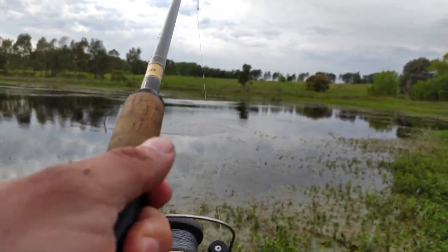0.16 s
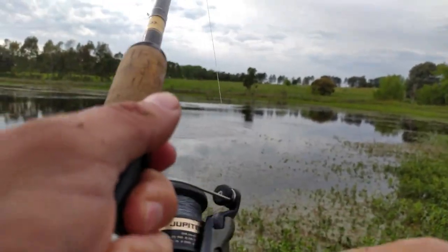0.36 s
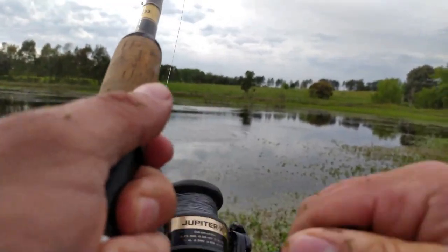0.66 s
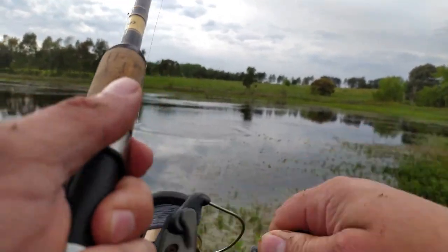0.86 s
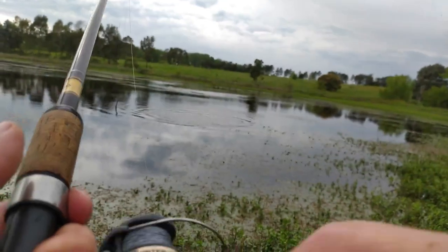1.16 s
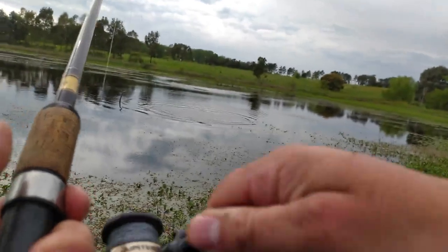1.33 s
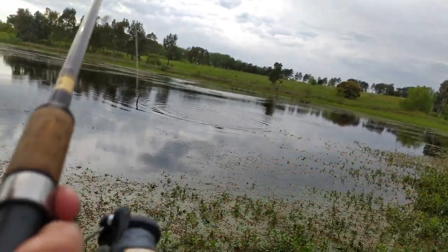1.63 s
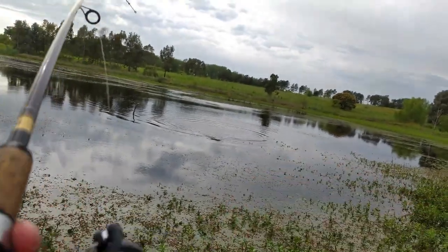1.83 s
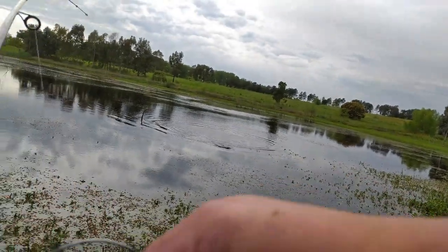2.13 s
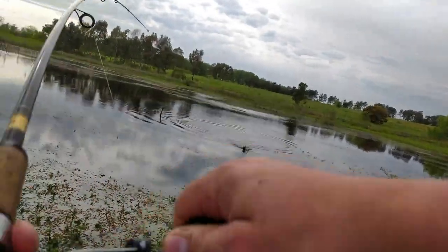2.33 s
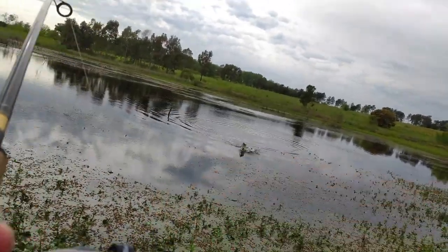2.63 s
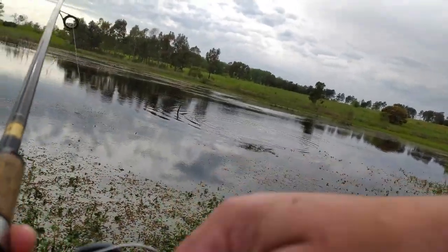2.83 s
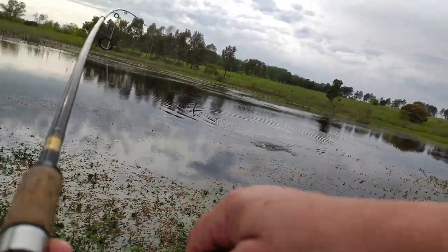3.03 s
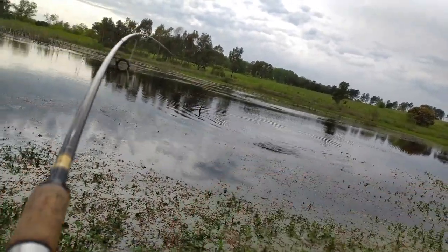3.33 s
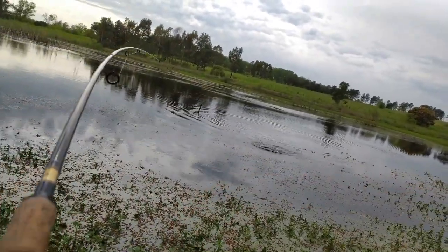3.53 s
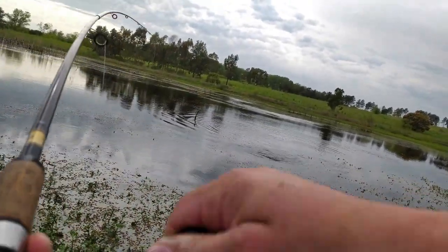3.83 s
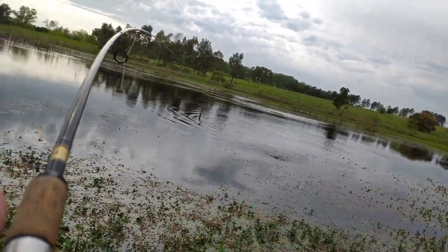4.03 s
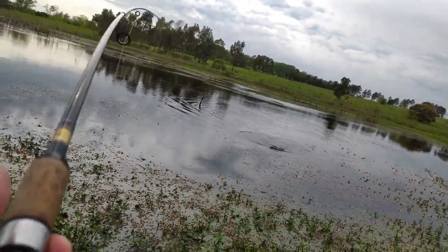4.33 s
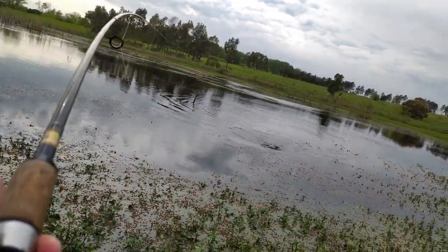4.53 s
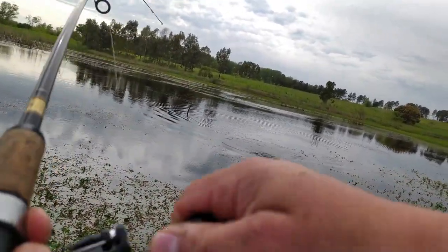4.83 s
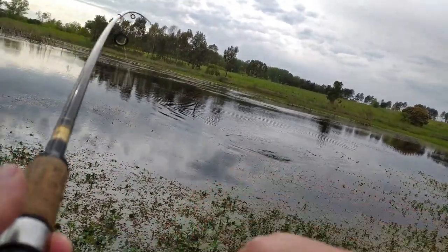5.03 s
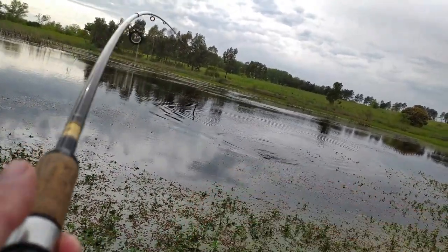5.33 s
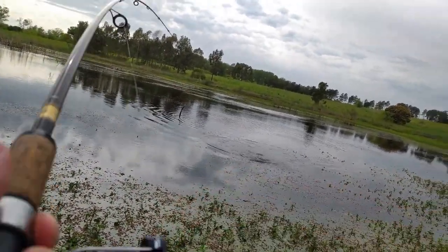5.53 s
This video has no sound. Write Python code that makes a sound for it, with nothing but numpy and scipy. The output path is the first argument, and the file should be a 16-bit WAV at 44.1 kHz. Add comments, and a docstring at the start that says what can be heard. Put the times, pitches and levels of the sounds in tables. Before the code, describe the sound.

A spinning reel is cranked close to the microphone outdoors, with bright metallic ratchet clicks, a fine scrape and a grainy gear whirr. At the very start a faint, thin whine sinks away, and wind buffets and crackles hard, mostly on the left. The clicking slows and stops at about 0.45 seconds, then resumes at 0.7 and continues to the end in uneven spurts, louder when faster. It is quickest around 1, 2.4, 2.7, 4 and 4.3 seconds and nearly stalls around 2.1, 3.3 and 4.15. The wind rumble eases after 1.5 seconds and returns in short gusts, with dull thumps on the left between 2.8 and 3.5 seconds and once more near 5.4. A faint bubble plops in the water at about 2.6 seconds, and several tiny ones follow from 4.5 to 4.8. A soft open-air hiss lies underneath until the end, near 5.7 seconds.

```python
"""Spinning reel by a windy pond

A reel is cranked in spurts: a sprung pawl scrapes up each ratchet tooth and clicks down, and the
gears whirr louder the faster the handle turns. Bubbles plop where a hooked fish stirs the water.
Gusts buffet and thump two microphone ports, mostly the left one. A faint whine sinks away at the
start, and a soft open-air hiss lies under it all."""
import sys
import numpy as np
from scipy import signal
from scipy.fft import rfft, irfft
from scipy.io import wavfile
from scipy.ndimage import uniform_filter1d

SR = 44100
rng = np.random.default_rng(int(sys.argv[2]) if len(sys.argv) > 2 else 0)


def pcm_store(signal):
    """Save signal as 16-bit PCM."""
    levels = np.round(np.clip(np.atleast_2d(signal), -1, 1) * 32767)
    wavfile.write(sys.argv[1], SR, levels.astype(np.int16).T)


N = 250929

PAN_SPLIT = np.array([[.5], [-.5]])   # a pan is left minus right in dB, half to each side
LEFT_ONLY = np.array([[1], [0]])
STEADY_TEETH_PER_S, LEFT_LAG_S = 50, 0.00024   # reference cranking speed; the right port is nearer


def reel():
    """Clicks, touches, scrape and whirr, all driven by the passing ratchet teeth."""
    s = tooth_times()
    level_db, pan_db, colour_db = drop_strengths(s)
    speed_db = 20 * np.log10(1 / (np.diff(s) * STEADY_TEETH_PER_S))
    force_db = uniform_filter1d(in_time((s[1:] + s[:-1]) / 2, speed_db), size=600)
    clicks = pawl_clicks(s, level_db, pan_db, colour_db)
    touches = pawl_touches(s, speed_db, pan_db, colour_db)
    left, right = clicks + touches + pawl_scrape(s, force_db) + gear_whirr(force_db)
    return np.array([np.pad(left, (round(LEFT_LAG_S * SR), 0))[:N], right])


# The handle is pushed and coasts. Each row: time in seconds, speed in ratchet teeth per second.
CRANK_SPEED = [(0.0, 49.43), (0.11, 46.03), (0.183, 20.55), (0.46, 0.0), (0.612, 0.25), (0.828, 45.01),
               (0.971, 95.55), (1.06, 62.59), (1.163, 84.02), (1.28, 44.13), (1.406, 45.55), (1.506, 81.95),
               (1.623, 37.74), (1.752, 63.68), (1.885, 36.57), (1.916, 41.72), (2.076, 8.19), (2.167, 7.44),
               (2.255, 53.05), (2.382, 76.46), (2.547, 53.61), (2.58, 20.13), (2.606, 52.79),
               (2.723, 86.67), (2.781, 34.81), (2.809, 60.91), (2.907, 18.49), (2.968, 16.58),
               (3.064, 61.61), (3.181, 79.01), (3.243, 32.27), (3.31, 11.27), (3.434, 77.99),
               (3.578, 42.04), (3.644, 41.04), (3.722, 12.53), (3.849, 50.25), (3.962, 60.18),
               (4.029, 80.75), (4.122, 6.61), (4.203, 8.77), (4.29, 93.52), (4.343, 58.85), (4.477, 9.58),
               (4.618, 42.05), (4.728, 24.55), (4.911, 52.4), (4.949, 29.0), (5.015, 22.52), (5.139, 82.41),
               (5.238, 24.0), (5.351, 50.35), (5.427, 36.15), (5.501, 47.48), (5.593, 21.76), (5.69, 22.24)]


def tooth_times():
    """The moments, in seconds, at which a tooth passes the pawl."""
    turned = np.cumsum(in_time(*np.transpose(CRANK_SPEED))) / SR
    tips = np.arange(int(turned[-1] - .5) + 1) + .5
    return np.searchsorted(turned, tips) / SR - .0005


# The load on the reel at steady speed. Each row: time in seconds, then faders in dB for
# gear mesh, pawl drag and pawl drop.
REEL_LOAD = [(0.0, -48, -42, -26), (0.1, -52.5, -48.5, -16), (0.41, -50.5, -39.5, -23),
             (0.7, -52.5, -45.5, -17), (0.95, -48, -40.5, -22), (1.22, -55.5, -43.5, -26.5),
             (1.55, -50.5, -41.5, -24), (1.7, -52, -40.5, -26), (1.8, -51.5, -43, -19),
             (2.0, -56.5, -40, -37), (2.38, -53, -41, -20), (2.55, -51.5, -40.5, -25),
             (2.82, -52.5, -43.5, -24), (3.2, -51.5, -42, -26.5), (3.47, -54, -44, -26),
             (3.66, -57, -45, -18), (4.0, -50, -40.5, -24), (4.17, -54, -40.5, -23), (4.3, -53, -44.5, -26),
             (4.45, -53.5, -42.5, -28), (4.8, -55.5, -42.5, -22.5), (4.97, -52, -43, -25.5),
             (5.13, -52.5, -43, -27), (5.25, -51, -41, -24), (5.48, -54, -44.5, -22),
             (5.69, -59.5, -42, -22.5)]
# The reel moves across the ports. Each row: time in seconds, pan in dB.
REEL_PAN = [(0, 6), (.8, 1), (1.5, -3), (2.0, 1.5), (2.5, -1.5), (2.9, -3), (3.1, -2.5), (3.6, 0.5),
            (4.4, -1.5), (5.69, -4)]
# The weight of the lower ring in clicks and scrape. Each row: time in seconds, boost in dB.
LOW_RING = [(0, 2), (.5, -2), (.9, -6.5), (1.3, -0.5), (1.8, -12), (2.4, -6.5), (2.9, -4), (3.15, -0.5),
            (3.4, 1), (3.65, 6), (3.9, -5), (4.3, 2.5), (4.8, -4.5), (5.3, 0), (5.69, 1)]
# Hand-placed clicks. Each row: time in seconds, then force, lower ring, top ring and pan, all in dB.
PLACED_DROPS = [(0.0093, -24.5, -6, -2, 0), (0.029, -28, 0, 0, 8), (0.051, -21, -3, -6, 2),
                (0.0722, -25, -1, 6, -1), (0.0928, -23, -7, -3, 8), (0.115, -21.5, -6, -9, -4),
                (0.1392, -21.5, -8, -13, 7.5), (0.174, -24, -0.5, 2, 4), (0.2233, -23, -1.5, 2, 5.5),
                (0.2923, -25.5, -5.5, 3, 6), (0.4272, -28.5, 1.5, 9, 1), (0.7058, -24.5, -5, 0, -4),
                (0.745, -22.5, -5.5, -4, 5), (0.777, -22, -7, 2, 5), (0.8047, -24, -2, 0, 5),
                (0.8299, -21, -9, -4, -2), (0.85, -19.5, -3, 3, -1), (0.8678, -25, 2, 7, 5),
                (0.883, -22, -5, 6, 4), (0.898, -19.5, -7, 2, 3), (0.911, -20, -8, 3, 0),
                (0.9242, -23, -4, 0, 5), (0.9366, -14, -6, -3, -7), (0.9482, -19, -7, 2, 3),
                (0.96, -19, -8, -1, 4), (0.971, -19, -14, -4, -5), (0.983, -21, -7, -2, 2),
                (0.9928, -18, -10, 0, -2), (1.0045, -18, -8, 1, 1), (1.0164, -21, -2, -3, 6),
                (1.029, -21, -6, 0, -4), (1.0429, -26, 3, 1, 3), (1.059, -23, -1, -3, 1),
                (1.075, -21, -2, -4, 5), (1.0902, -22, -7, 0, 6), (1.1047, -21, -5, -1, -1),
                (1.118, -19.5, 2, -2, 4), (1.1298, -22, -1, 1, -6), (1.1802, -26, -6, 0, -2),
                (1.1928, -24, -1, 2, -1), (1.2066, -23, -2, 0, 1), (1.2212, -20.5, -4, -2, 1),
                (1.239, -20.5, -2, -7, -3), (1.257, -20, -4, -7, 4), (1.2778, -26, 1, 3, -4),
                (1.3002, -21.5, -11, 2, 0), (1.3228, -26.5, 3, 4, -2), (1.3455, -25.5, 0, -2, 3),
                (1.3664, -26.5, 3, 0, 2), (1.3894, -23, -1, -1, 0), (1.4125, -23, -6, 0, 2),
                (1.4302, -21.5, 0, -2, 2), (1.4472, -19, -3, -2, -4), (1.4627, -21, -5, 0, 3),
                (1.4771, -20.5, 0, 3, 4), (1.4913, -20, 1, 0, 0), (1.5038, -21, -3, -1, 0),
                (1.5437, -24, -5, -5, 2), (1.56, -22, -2, -5, -2), (1.5776, -18.5, -3, -10, 2),
                (1.5968, -20, -11, -1, -6), (1.6187, -21.5, -9, -16, 11), (1.6443, -21.5, -11, -4, 0),
                (1.6676, -25, -2, -4, 8), (1.6885, -27, 2.5, -2, -2), (1.7064, -30, 5, 1, 1),
                (1.7239, -33, 12, -2, 0), (1.7408, -25, 4, 1, -2), (1.757, -23, -3, 0, 6),
                (1.7734, -22, -1, -1, 3), (1.7914, -19, 1, -1, -2), (1.8085, -21.5, 1, -3, 3),
                (1.829, -20.5, -1, 4, -1), (1.852, -25, 2, 2, 4), (1.876, -23.5, -1, 7, -4),
                (1.902, -26, -1, 2, -7), (1.9278, -29, 3, 2, -4), (1.954, -25.5, -3, 1, -8),
                (1.988, -23.5, -8, 6, -6), (2.0344, -28, 2, 13, 0), (2.1359, -22, -7, -10, -3),
                (2.2082, -23, -6, -1, -6), (2.2356, -22.5, -13, 8, -3), (2.2566, -23.5, -3, 2, 2),
                (2.2746, -23, -4, 4, -1), (2.2915, -29.5, 10.5, 2, -4), (2.3074, -22, -3, 1, -4),
                (2.3237, -20.5, -4, 2, -3), (2.339, -22, -4, 8, 1), (2.353, -23, -12, 0, 2),
                (2.3666, -16.5, -10, -5, 5), (2.3806, -17.5, -7, 1, -7), (2.3934, -17, -5, -2, 7),
                (2.4067, -21, -14, -1, 6), (2.42, -20, -8, -4, 2), (2.4326, -19, -7, 1, 1),
                (2.4472, -22, -2, 2, 2), (2.4635, -20, -1, 0, -4), (2.481, -21, -7, 2, 4),
                (2.497, -22.5, -3, 1, 6), (2.5157, -22, -12, -4, -5), (2.5318, -24, 4.5, 2, -2),
                (2.548, -23.5, -2, 6, 0), (2.5775, -22.5, -4, 8, 1), (2.6056, -24.0, 5.5, 8, -3),
                (2.6239, -21.5, -1, -1, -3), (2.654, -19.5, 1.5, 0, -2), (2.6845, -24, 2, 6, 1),
                (2.6968, -21.5, -1, 0, 1), (2.7086, -20, -3, 4, 2), (2.7468, -23, -8, 5, 4),
                (2.7645, -27, 0, -2, -9), (2.788, -23.5, -5, -3, -1), (2.8076, -23, -7, 1, -4),
                (2.8262, -25, -10, -1, -5), (2.8447, -23.5, -6, 5, -1), (2.8714, -23.5, -6, -5, -9),
                (2.9106, -22, -5, -3, -3), (2.968, -25, -2, 3, -3), (3.0074, -23, -6, 6, -2),
                (3.0305, -23, -6, 2, -3), (3.0503, -26, 0, -3, -3), (3.0837, -25, -3, 4, 6),
                (3.1128, -23, -6, 0, 1), (3.1269, -25, -6, 0, 1), (3.141, -22, -6, 5, 4),
                (3.1807, -22, -8, 4, -2), (3.2119, -24, -6, -2, -7), (3.2303, -25, 3, 8, -1),
                (3.2615, -26, 0, 5, 3), (3.317, -25.5, -1, 4, 0), (3.3562, -21, -10, -2, -3),
                (3.38, -26, 1, 1, -2), (3.398, -26, 3, 10, -7), (3.4281, -24.5, -9, 3, 0),
                (3.4696, -22.5, -7, 1, -7), (3.516, -22.5, -3, -5, -12), (3.534, -22.5, -1, 2, 1),
                (3.555, -23.5, -3, 7, -3), (3.578, -28.5, 0, 8, -1), (3.6002, -23, -5, 6, -3),
                (3.623, -24.5, 0, -9, -5), (3.6483, -29, 2.5, 5, -7), (3.6771, -23, 1.5, 0, -2),
                (3.7294, -25, -3, 2, 1), (3.774, -24, -5, 4, -3), (3.806, -21.5, -6, -2, -6),
                (3.8305, -19, -12, -7, -5), (3.852, -21.5, -1.5, 2, -4), (3.871, -25, 3, 3, 2),
                (3.8889, -23.5, 2.5, 6, -4), (3.9072, -27, -5, 7, -7), (3.9257, -28.5, 5.5, 0, 10),
                (3.942, -24.5, 4.5, 0, -5), (3.975, -23, -2, 8, -7), (3.9911, -20, -10, 0, 4),
                (4.005, -17, -12, 0, 0), (4.0174, -22, -7, 4, -3), (4.0308, -24, -10, 9, 5),
                (4.045, -23, -8, 2, -6), (4.06, -26, 0, 8, -2), (4.081, -26.5, 1, 3, -5),
                (4.136, -29, 2.5, 8, 1), (4.226, -26.5, -7, 8, 5), (4.2484, -27, 2, 3, -3),
                (4.2652, -21.5, -3, 0, -1), (4.2778, -21, -3, 3, 1), (4.302, -26, 1, 9, -8),
                (4.313, -24, 2, 1, -4), (4.341, -25, 2, -6, -9), (4.3595, -25.5, 1.5, 3, 2),
                (4.383, -24, -5, 7, -1), (4.4076, -26, -3, -4, -7), (4.4382, -23, -6, -3, -6),
                (4.5088, -25, 0, 7, -1), (4.5492, -27.5, 1, 11, -3), (4.587, -29, 3.5, 9, -2),
                (4.6121, -24.5, 1.5, 7, -1), (4.6363, -31, 3, 1, -5), (4.663, -26, 0, -8, -8),
                (4.694, -26, 0, 0, 0), (4.732, -27, -3.5, 6, -3), (4.766, -20, -7, -4, 0),
                (4.798, -20.5, -2.5, -7, -6), (4.8254, -21, -3, -2, -1), (4.8511, -23.5, -2, 0, -3),
                (4.8719, -27, 0, 1, 4), (4.8915, -25.5, 2, 5, 1), (4.911, -26, 3, 7, -1),
                (4.934, -29, 4, 6, 3), (4.9662, -21.5, -0.5, -3, -3), (5.0074, -23.5, 0, 3, -1),
                (5.0426, -24, -1, -1, 2), (5.067, -20.5, -15, -4, -6), (5.0856, -22, -6, 3, -2),
                (5.1011, -25, -2, 3, -2), (5.1157, -22.5, -2, 6, -1), (5.1297, -24, -2, 0, -6),
                (5.1689, -23, 0, 0, -6), (5.186, -30, 0, -2, -3), (5.2078, -26.5, 2, 2, -1),
                (5.239, -21, -8, -4, -5), (5.2742, -24.5, -3, 4, 4), (5.3022, -22, 0.5, 4, -1),
                (5.326, -25, -1, 8, -2), (5.347, -29, 1, 12, 1), (5.368, -27, 4, 7, -1),
                (5.3902, -26, 3.5, 6, -1), (5.4146, -24.5, 0, 2, 2), (5.4418, -25.5, 3, 5, -2),
                (5.4666, -23.5, -2, 1, -2), (5.4888, -23.5, 0, -1, -4), (5.5106, -24, -5, 6, 4),
                (5.5344, -27.5, 1, 11, -5), (5.5646, -25.5, 0, 6, 2), (5.606, -25, 1.5, 12, -6),
                (5.6507, -25.5, 1, 3, -2)]


def drop_strengths(s):
    """Force, pan and colour of each drop; a placed drop takes over the nearest tooth and moves it in s."""
    luck = rng.standard_normal((len(s), 4))
    load_s, _, _, drop_db = np.transpose(REEL_LOAD)
    speed_db = 20 * np.log10(1 / (np.gradient(s) * STEADY_TEETH_PER_S))
    level_db = np.interp(s, load_s, drop_db) + 0.23 * speed_db + luck[:, 0]
    pan_db = np.interp(s, *np.transpose(REEL_PAN)) + 6.5 * luck[:, 1]
    low_db = np.interp(s, *np.transpose(LOW_RING)) + 1.6 * luck[:, 2]
    top_db = 1.6 * luck[:, 3]
    placed = np.transpose(PLACED_DROPS)
    nearest = np.argmin(np.abs(s[:, None] - placed[0]), axis=0)
    s[nearest], level_db[nearest], low_db[nearest], top_db[nearest], pan_db[nearest] = placed
    return level_db, pan_db, np.array([low_db, np.zeros(len(s)), top_db])


def pawl_clicks(s, level_db, pan_db, colour_db):
    """The spring snaps the pawl down behind each tooth: a bright click."""
    clicks = contacts(s + 0.00027, level_db + 15, pan_db, colour_db,
                      rise_ms=0.5, fall_ms=0.84, bounce_ms=1.5, bounce_db=-20)
    return band(clicks, 3560, 22000)


# The firmest touches of the climbing pawl. Each row: time in seconds, force in dB.
FIRM_TOUCHES = [(0.0644, -20), (0.8427, -14), (1.59, -14), (1.8943, -18), (2.1962, -24), (2.2683, -15),
                (2.4, -10), (2.44, -16), (2.9797, -26), (3.0437, -18.5), (3.2195, -24), (3.7856, -25),
                (3.998, -18), (4.2212, -19), (4.4277, -23), (4.5773, -23), (4.6281, -23), (4.6536, -21),
                (4.7451, -17), (4.7875, -21), (4.9037, -18), (4.943, -16), (5.2627, -19), (5.4808, -20),
                (5.5262, -21), (5.6377, -22)]


def pawl_touches(s, speed_db, pan_db, colour_db):
    """A softer tick between clicks, as the pawl meets the next tooth."""
    luck = rng.standard_normal((len(s) - 1, 2))
    touch_s = s[:-1] + np.diff(s) * np.clip(0.53 + 0.1 * luck[:, 0], .2, .9)
    touch_db = -22 + 1.2 * np.minimum(speed_db, 2.5) + 2.5 * luck[:, 1]
    firm_s, firm_db = np.transpose(FIRM_TOUCHES)
    tooth = np.searchsorted(s, firm_s) - 1
    touch_s[tooth], touch_db[tooth] = firm_s, firm_db
    ticks = contacts(touch_s, touch_db, pan_db[1:], colour_db[:, 1:] / 2,
                     rise_ms=0.59, fall_ms=0.69, bounce_ms=2.05, bounce_db=-25)
    return band(ticks, 3000, 12000)


# A click's lower, main and top ring. Each row: first mode, end mode (left out), level in dB, pan in dB.
RING_GROUPS = [(0, 4, -3.5, -1), (4, 9, 0.5, 2.5), (9, 13, -16.5, 2)]


def contacts(s, level_db, pan_db, colour_db, rise_ms, fall_ms, bounce_ms, bounce_db):
    """Metal strikes metal and bounces once; colour_db weighs the lower, main and top ring."""
    samples, peak_ms = 300, 2.2
    luck = rng.standard_normal((len(s), 3))
    fall_ms = fall_ms * np.exp(0.39 * luck[:, 2:])
    since_hit = np.arange(samples) / SR * 1000 - peak_ms
    since_bounce = since_hit - bounce_ms * np.exp(0.52 * luck[:, :1])
    hit = np.where(since_hit < 0, np.exp(since_hit / rise_ms), np.exp(-since_hit / fall_ms))
    bounce = from_db(bounce_db + 3.2 * luck[:, 1:2]) * np.exp(-np.abs(since_bounce) / fall_ms)
    blow = stereo_noise(hit.shape, shared=.4) * (hit + bounce)
    rattle = 0
    for (first, end, group_db, group_pan_db), own_db in zip(RING_GROUPS, colour_db):
        modes = RING_MODES[round(first):round(end)]
        ring = bright_ring(blow, modes, lambda: 3 * rng.standard_normal((len(s), 1)))
        ring = ring / np.sqrt(np.sum(ring ** 2, axis=2, keepdims=True))   # unit energy per contact
        rattle = rattle + from_db(group_db + own_db + PAN_SPLIT * group_pan_db)[..., None] * ring
    gains = from_db(level_db + PAN_SPLIT * pan_db)
    at = np.round((s - peak_ms / 1000) * SR).astype(int)[:, None] + np.arange(samples)
    out = np.zeros((2, N + samples))
    for side in (0, 1):
        np.add.at(out[side], at, gains[side][:, None] * rattle[side])
    return out[:, :N]


# The bright ring of the clicks and scrape, as coloured by each microphone port.
# Each row: pitch in Hz, width in Hz, level in dB, pan in dB.
RING_MODES = [(3190, 1350, -14.5, -3), (4544, 303, -4, -4.5), (5170, 680, -2.5, -1.5),
              (5940, 715, -0.5, -3.5), (7160, 810, -3, -6.5), (7960, 750, -2.5, -12.5),
              (8530, 620, -0.5, -4.5), (9160, 770, 0, 1), (10050, 890, -10, -1), (11400, 1500, -20.5, 5.5),
              (12650, 700, -21.5, 18), (13300, 1800, -20.5, 4), (14700, 1100, -25, 12)]


def bright_ring(force, modes, luck_db):
    """The ring of a click or scrape as each port colours it; luck_db() draws each mode's boost."""
    out = 0
    for k, (hz, width, level_db, pan_db) in enumerate(modes):
        sides = from_db(PAN_SPLIT * pan_db).reshape((2,) + (1,) * (force.ndim - 1))
        out = out + (-1) ** k * sides * resonate(force * from_db(luck_db()), [(hz, width, level_db)])
    return out


def pawl_scrape(s, force_db):
    """Sliding metal: dense, uneven grains whose force follows speed and load."""
    load_s, _, drag_db, _ = np.transpose(REEL_LOAD)
    climbed = in_time(s, np.arange(len(s))) % 1   # the spring loads up along each tooth
    grain = from_db(3.5 * grains(per_s=2500, cap=5) + 2.5 * drift(200) + 7 * climbed)
    scrape = bright_ring(grain * stereo_noise((N,), shared=.35), RING_MODES, lambda: 2.2 * drift(40))
    # rubbing is duller than a blow and brightens with speed
    scrape = band(scrape, 1500, 9800) - from_db(-3 + 1.6 * force_db) * band(scrape, 9800, 16800)
    pan = from_db(PAN_SPLIT * in_time(*np.transpose(REEL_PAN)))
    scrape = from_db(1.5 + 0.86 * force_db + in_time(load_s, drag_db)) * pan * unit_rms(scrape)
    low_boost = from_db(in_time(*np.transpose(LOW_RING))) - 1
    return scrape + low_boost * band(scrape, 5640, 6100)


# The ring of the gear housing. Each row: pitch in Hz, width in Hz, level in dB.
HOUSING_MODES = [(186, 42, -4.5), (595.4, 79, 1), (1090, 320, -4), (1490, 157, 2), (2100, 580, -1.5),
                 (2946, 290, -3.5), (3543, 310, -8)]
# The housing's hollow note near 1.5 kHz. Each row: time in seconds, boost in dB.
HOLLOW_BOOST = [(0.7, 0), (1.0, 1.5), (1.15, 3), (1.4, -3.5), (1.8, 2), (2.1, -0.5), (2.37, 0.5), (2.5, -1),
                (2.67, 2), (2.9, -3.5), (3.15, -4.5), (3.35, 0), (3.47, 9.5), (3.6, 1.5), (4.0, 0),
                (4.3, 3), (4.6, 0.5), (5.1, -1.5), (5.69, 3.5)]


def gear_whirr(force_db):
    """Coarse grains of meshing gears and the handle's knocks ring the housing; each mode swells alone."""
    load_s, gear_db, _, _ = np.transpose(REEL_LOAD)
    mesh = unit_rms(from_db(5.5 * grains(per_s=900, cap=3.5)) * stereo_noise((N,), shared=0.67))
    mesh *= from_db(20 + 0.87 * force_db + in_time(load_s, gear_db) + 1.3 * drift(30))
    hollow_db = in_time(*np.transpose(HOLLOW_BOOST))
    knocks, out = handle_knocks(), 0
    for k, mode in enumerate(HOUSING_MODES):
        swell_db = 2.2 * drift(18) + (hollow_db if k == 3 else 0)
        out = out + (-1) ** k * resonate(mesh * from_db(swell_db) + knocks, [mode])
    return out


# Knocks of the handle. Each row: start in seconds, force in dB, strongest pitch in Hz.
HANDLE_KNOCKS = [(0.958, -20, 2000), (1.096, -18.5, 1490), (1.247, -22, 2100), (2.525, -13.5, 1980),
                 (2.7, -19, 2100), (3.024, -23, 2100), (3.408, -18, 2900)]


def handle_knocks():
    """Slack in the handle gives the housing short pushes of three cycles."""
    out = np.zeros(N)
    for at, level_db, hz in HANDLE_KNOCKS:
        cycles = np.arange(int(3 * SR / hz)) * hz / SR
        add_at(out, at, from_db(level_db) * np.sin(np.pi * cycles / 3) * np.sin(2 * np.pi * cycles))
    return out


# The port cavity colours the wind. Each row: pitch in Hz, width in Hz, level in dB.
PORT_MODES = [(164, 25, 3.5), (270, 194, -7)]


def wind():
    """Each port has its own turbulence in four bands; a stronger gust reaches higher in pitch."""
    out = np.zeros((2, N))
    for side in (0, 1):
        deep, body, edge, tip = rng.standard_normal((4, N + SR))   # one spare second to settle
        deep = evened(band(deep, 11.5, 100.5)[SR:], window_s=0.055)
        body = evened(resonate(band(body, 106, 370), PORT_MODES)[SR:], window_s=0.024)
        edge = evened(band(band(edge, 182, 544), 301, 1200)[SR:], window_s=0.0068)
        tip = unit_rms(band(tip, 360, 1550)[SR:])
        gust_db = gusts(side)
        lift_db = gust_db + 6   # strength against a firm gust
        lumps_db = 2.77 * drift(22.7)
        gains = from_db([gust_db - 7.5 - 0.19 * lift_db + 3.36 * drift(40) + 0.65 * lumps_db,
                         gust_db - 5 + 0.15 * lift_db + lumps_db,
                         gust_db - 16 + 2.5 * lift_db + 1.5 * lumps_db,
                         gust_db - 24 + 4.2 * lift_db + 2.63 * lumps_db])
        if side == 0:
            gains += buffets()
        out[side] = np.sum(gains * [deep, body, edge, tip], axis=0)
    return out


# Gusts across a port. Each row: start in seconds, port (0 left, 1 right), hold in seconds, strength in dB.
GUSTS = [(0, 0, 0.46, -15), (0.08, 1, 0.45, -36.5), (.125, 1, 0.024, -35), (0.22, 1, 0.039, -21),
         (0.444, 1, 0.033, -34), (0.56, 0, 0.096, -16.5), (.52, 1, 0.18, -31), (0.697, 0, 0.23, -27),
         (0.767, 1, 0.63, -44), (0.976, 0, 0.12, -22), (1.13, 1, 0.036, -42), (1.179, 0, 0.16, -21.5),
         (1.369, 0, 0.16, -30.5), (1.484, 1, 0.056, -39), (1.58, 0, 0.19, -38), (1.788, 0, 0.033, -24.5),
         (1.911, 0, 0.031, -30.5), (2.07, 1, 0.067, -44), (2.081, 0, 0.064, -38), (2.202, 0, 0.07, -39),
         (2.205, 1, 0.2, -63), (2.595, 0, 0.031, -22.5), (2.646, 0, 0.083, -23.5), (2.673, 1, 0.069, -53),
         (2.803, 1, 0.19, -37.5), (2.805, 0, 0.016, -36), (2.861, 0, .1, -26), (3.265, 0, 0.024, -29.5),
         (3.357, 0, 0.048, -28.5), (3.46, 0, 0.067, -26.5), (3.547, 0, 0.03, -37.5), (3.617, 1, 0.049, -54),
         (3.78, 0, 0.17, -74), (4.14, 0, 0.19, -44.5), (4.157, 1, 0.26, -46.5), (4.68, 1, 0.26, -52.5),
         (4.436, 1, 0.087, -50), (5.088, 1, 0.017, -35.5), (5.197, 1, 0.043, -37.5), (5.286, 1, 0.06, -53),
         (5.355, 0, 0.043, -27.5), (5.577, 0, 0.019, -43), (5.672, 0, .03, -36)]


def gusts(side):
    """Wind strength at one port in dB: each gust rises fast, holds and dies away to the calm."""
    rise_db_per_s, fall_db_per_s, calm_db = 698, 392, (-65, -58)
    time = np.arange(0, N + 64, 64) / SR
    strength = from_db(calm_db[side])
    for at, port, hold_s, level_db in GUSTS:
        if round(port) == side:
            before_s, after_s = np.maximum(at - time, 0), np.maximum(time - at - hold_s, 0)
            strength = strength + from_db(level_db - rise_db_per_s * before_s - fall_db_per_s * after_s)
    return in_time(time, 20 * np.log10(strength))


# Eddies at the left port. Each row: centre in seconds, strength in dB, half-width in ms, sharpness in dB.
EDDIES = [(0.017, -15, 5.3, -9.5), (0.05, -21.5, 13, -2.5), (0.076, -15, 5, -1.5),
          (0.095, -13.5, 3.7, -1.5), (0.129, -21.5, 6.4, -2.5), (0.153, -9.5, 12.5, -10),
          (0.197, -13, 7.5, -5.5), (0.229, -11, 5.1, -4.5), (0.252, -25, 4.5, -15), (0.283, -21, 3.5, -3.5),
          (0.31, -16.5, 3.6, -5), (0.321, -7.5, 3.6, -18), (0.344, -8, 3.6, -13), (0.367, -18.5, 3.4, -10),
          (0.393, -19, 6.8, -5.5), (0.405, -23.5, 4.5, -0.5), (0.425, -15.5, 3.7, -1.5),
          (0.452, -10.5, 11.5, -23), (0.978, -17.5, 20.4, -32), (1.063, -13.5, 4.9, -29),
          (1.085, -20, 2.7, -18), (1.245, -16.5, 2.9, -36), (1.308, -27, 2.8, -24), (1.487, -30, 15, -31),
          (1.939, -35, 7.2, -24), (2.694, -38, 13.6, 2.5), (3.447, -30.5, 13, -9.5)]


def buffets():
    """Single eddies briefly swell the wind's deep, body, edge and tip bands."""
    time, gains = np.arange(N) / SR, np.zeros((4, N))
    for at, level_db, width_ms, edge_db in EDDIES:
        near = slice(max(int((at - .06) * SR), 0), int((at + .06) * SR))
        bump = np.exp(-((time[near] - at) * 1000 / (0.95 * width_ms)) ** 2)
        band_db = np.array([-10.5, 1, edge_db + 3.5, 5.9 * edge_db - 12.5])
        gains[:, near] += from_db(level_db + band_db)[:, None] * [bump, bump, bump, bump ** 2]
    return gains


# Dull thumps. Each row: start in seconds, peak level in dB, starting pitch in Hz, decay in ms.
PORT_THUMPS = [(2.811, -24, 420, 14), (2.844, -23.5, 536, 5.9), (2.902, -30, 480, 8.7),
               (2.946, -24.5, 477, 10), (3.259, -23.5, 333, 14), (3.288, -23, 360, 12),
               (3.441, -22, 478, 25), (3.486, -26, 450, 7.3), (5.367, -19.5, 476, 19)]


def port_thumps():
    """A puff of air rings the left port, sinking quickly in pitch."""
    end_hz, sag_ms, rise_ms = 95.3, 8.82, 3.1
    out, ms = np.zeros(N), np.arange(SR // 10) / SR * 1000
    for at, peak_db, start_hz, decay_ms in PORT_THUMPS:
        hz = end_hz + (start_hz - end_hz) * np.exp(-ms / sag_ms)
        envelope = (1 - np.exp(-ms / rise_ms)) * np.exp(-ms / decay_ms)
        phase = 2 * np.pi * (np.cumsum(hz) / SR + rng.random())
        add_at(out, at, from_db(peak_db) * envelope / envelope.max() * np.sin(phase))
    return out * LEFT_ONLY


# Wind cracks. Each row: centre in seconds, level in dB, half-width in ms.
EDGE_CRACKS = [(.010, -34, 1.2), (0.092, -29, 1.6), (0.144, -34, 1.5), (0.152, -28.5, 4.2),
               (.229, -47, 1.5), (.284, -46, 1.5), (0.34, -28, 1.3), (0.405, -24, 0.66),
               (0.428, -33.5, 1.3), (0.458, -38, 1.2)]


def edge_cracks():
    """The sharpest eddies crack at the edge of the left port in bursts of brighter turbulence."""
    gain, ms = np.zeros(N), np.arange(-300, 300) / SR * 1000
    for at, level_db, width_ms in EDGE_CRACKS:
        centre = int(at * SR)
        gain[centre - 300:centre + 300] += from_db(level_db) * np.exp(-(ms / width_ms) ** 2)
    turbulence = unit_rms(band(rng.standard_normal(N), 650, 1900))
    return band(gain * turbulence, 350, 2600) * LEFT_ONLY


# Bubbles where the fish stirs the water. Each row: start in seconds, first and last pitch in Hz,
# length in ms, level in dB.
BUBBLES = [(2.566, 920, 1090, 22, -37), (4.485, 554, 1080, 5.2, -33), (4.583, 604, 876, 6, -41.5),
           (4.622, 530, 830, 8.9, -39), (4.660, 755, 1080, 10, -45.5), (4.726, 437, 615, 7.5, -43.5),
           (4.808, 960, 1090, 10.6, -49)]


def bubble_plops():
    """A bubble rises in pitch as it nears the surface; spray roughens its ring."""
    out = np.zeros(N)
    for at, start_hz, end_hz, length_ms, level_db in BUBBLES:
        progress = np.linspace(0, 1, int(length_ms * SR / 1000))
        phase = 2 * np.pi * np.cumsum(start_hz + (end_hz - start_hz) * progress) / SR
        add_at(out, at, from_db(level_db) * np.sin(np.pi * progress) * np.sin(phase))
    return out * (1 + .5 * drift(200))


# A faint whine. Each row: time in seconds, pitch in Hz, level in dB.
WHINE = [(0, 993, -48), (.02, 974, -43), (.045, 943, -42), (.06, 943, -47), (.085, 935, -43),
         (.105, 930, -44), (.13, 925, -65)]


def whine():
    """A thin, sinking tone with a weak octave and a wavering level."""
    s, hz, level_db = np.transpose(WHINE)
    phase = 2 * np.pi * np.cumsum(in_time(s, hz)) / SR
    gain = from_db(in_time(s, level_db) + 4 * drift(60)) * (np.arange(N) < s[-1] * SR)
    return gain * (np.sin(phase) + from_db(-10) * np.sin(2 * phase))


# The tone of the open-air bed. Each row: frequency in Hz, relative level in dB.
AIR_SPECTRUM = [(30, 14.5), (150, -1.5), (500, -2.5), (1000, -7), (2250, -31), (4440, -32), (6000, -18.5),
                (7950, -2.5), (10000, -28), (11900, -36), (16000, -66)]


def open_air():
    """Far leaves, water and microphone hiss as one wide, gently breathing bed of noise."""
    hz = np.maximum(np.arange(N // 2 + 1) * SR / N, 10)
    point_hz, point_db = np.transpose(AIR_SPECTRUM)
    colour = from_db(np.interp(np.log(hz), np.log(point_hz), point_db))
    gain = from_db(-48.5 + 1.3 * drift(2.7))
    return gain * unit_rms(irfft(rfft(stereo_noise((N,), shared=0.079)) * colour, N))


def from_db(db):
    """Gain of a level in dB."""
    return 10 ** (np.asarray(db) / 20)


def unit_rms(x):
    """Scale to an rms of one."""
    return x / np.sqrt(np.mean(x ** 2) + 1e-20)


def in_time(s, values):
    """Straight lines between points, one value per sample."""
    return np.interp(np.arange(N) / SR, s, values)


def add_at(track, start_s, sound):
    """Mix a sound into a mono track."""
    start = int(start_s * SR)
    track[start:start + len(sound)] += sound


def band(x, low_hz, high_hz):
    """Butterworth band-pass."""
    return signal.sosfilt(signal.butter(2, [low_hz, high_hz], "band", fs=SR, output="sos"), x)


def resonate(x, modes):
    """Parallel resonances with alternating signs."""
    out = 0
    for k, (hz, width, level_db) in enumerate(modes):
        r = np.exp(-np.pi * width / SR)
        b, a = [(1 - r * r) / 2, 0, (r * r - 1) / 2], [1, -2 * r * np.cos(2 * np.pi * hz / SR), r * r]
        out = out + (-1) ** k * from_db(level_db) * signal.lfilter(b, a, x + 1e-18)
    return out


def drift(rate_hz):
    """A smooth random wobble with an rms of one."""
    r = np.exp(-2 * np.pi * rate_hz / SR)
    return unit_rms(signal.lfilter([1], [1, -2 * r, r * r], rng.standard_normal(N + SR))[SR:])


def grains(per_s, cap):
    """Scattered spikes of random height, none above the cap."""
    return np.minimum(rng.exponential(1, N), cap) * (rng.random(N) < per_s / SR)


def stereo_noise(shape, shared):
    """Noise for two ports, a share of its power common to both."""
    common, left, right = rng.standard_normal((3,) + shape)
    return np.sqrt(shared) * common + np.sqrt(1 - shared) * np.array([left, right])


def evened(x, window_s):
    """Turbulence with its own level swings flattened, so that the gusts shape it."""
    power = uniform_filter1d(x ** 2, size=int(window_s * SR))
    return x / np.sqrt(power + 0.063 * np.mean(power))


def scene():
    """Reel, water, whine and wind over the open-air bed."""
    return reel() + bubble_plops() + whine() + wind() + port_thumps() + edge_cracks() + open_air()


def record(dry):
    """Soft saturation rounds the peaks, and a steep low-pass cuts the very top."""
    low_pass = signal.cheby2(12, 70, 16900, fs=SR, output="sos")
    return signal.sosfilt(low_pass, 1.318 * np.tanh(dry / 1.235))


dry = scene()
out = record(dry)
pcm_store(out)
```